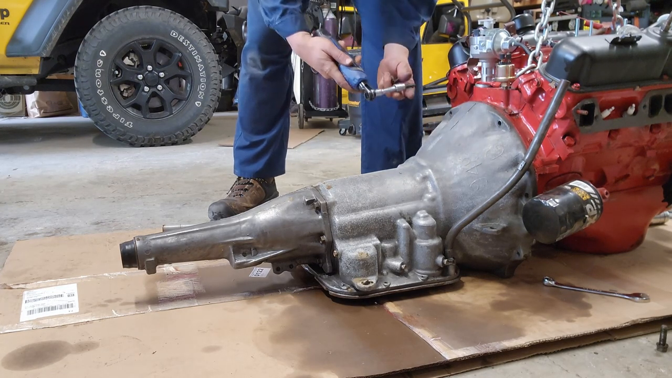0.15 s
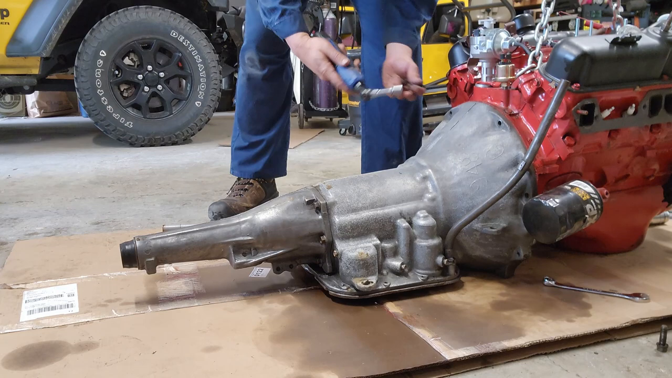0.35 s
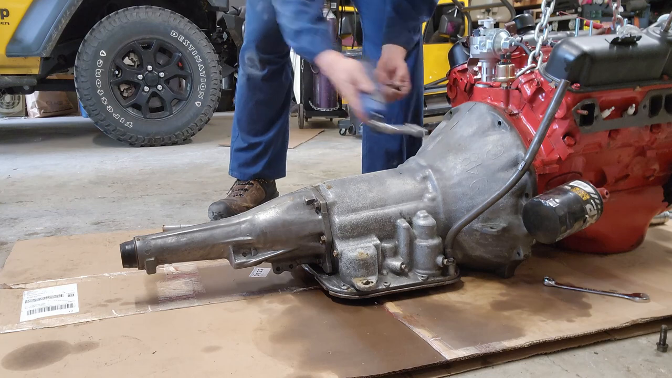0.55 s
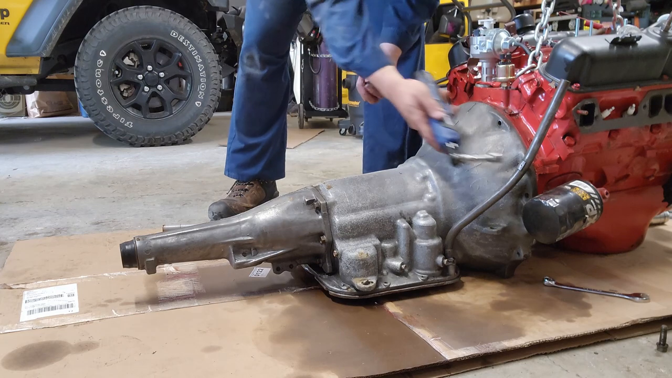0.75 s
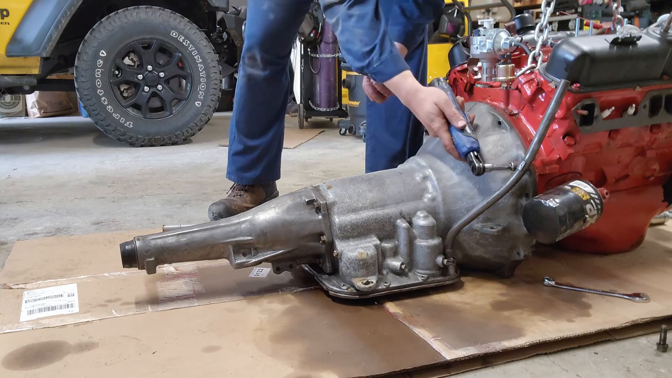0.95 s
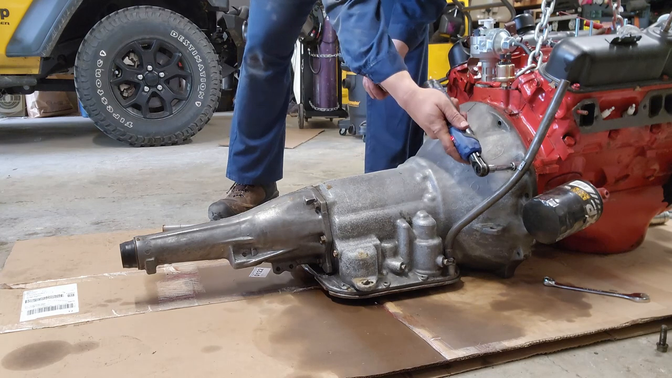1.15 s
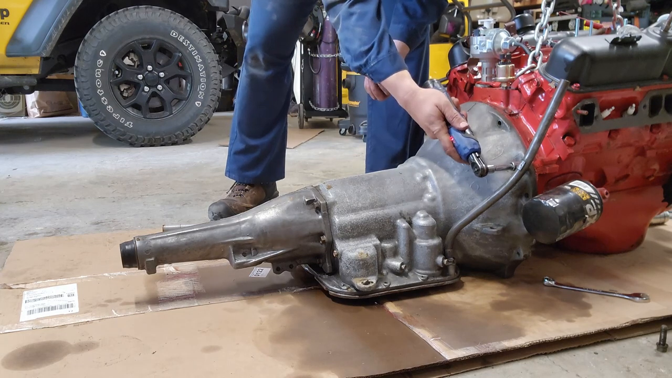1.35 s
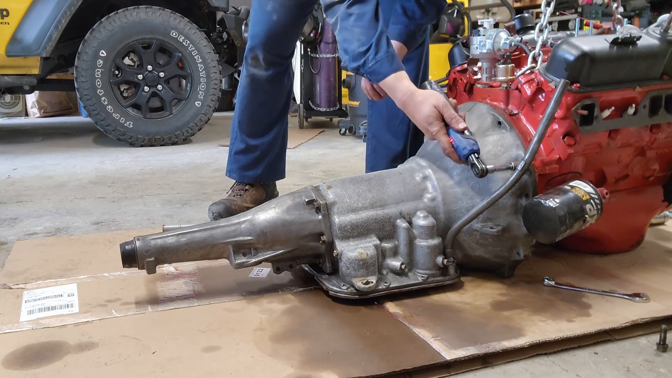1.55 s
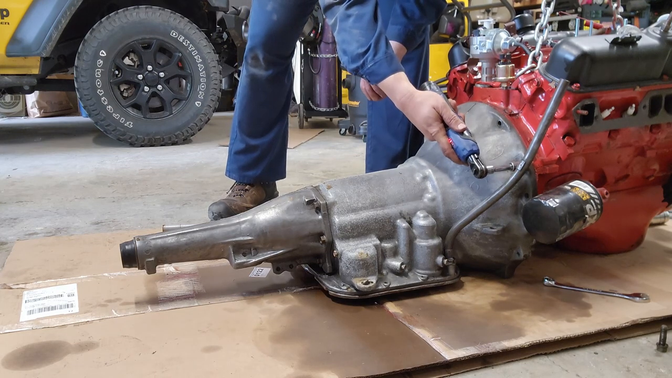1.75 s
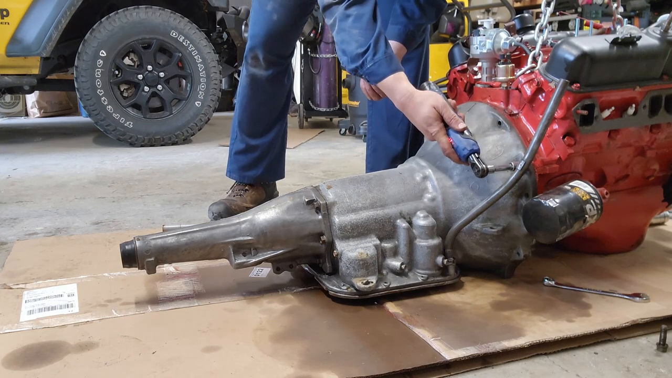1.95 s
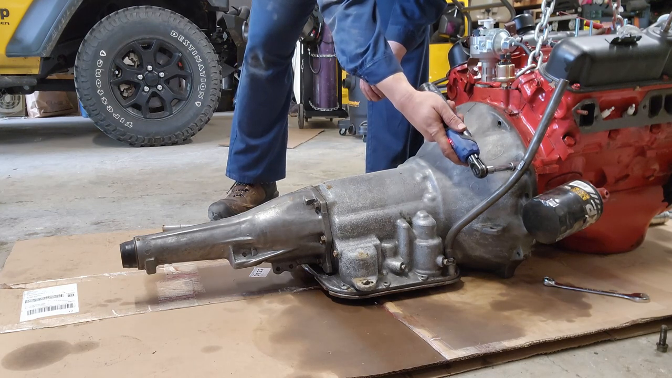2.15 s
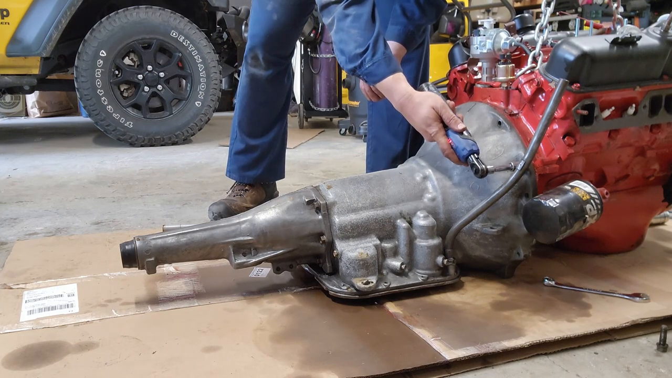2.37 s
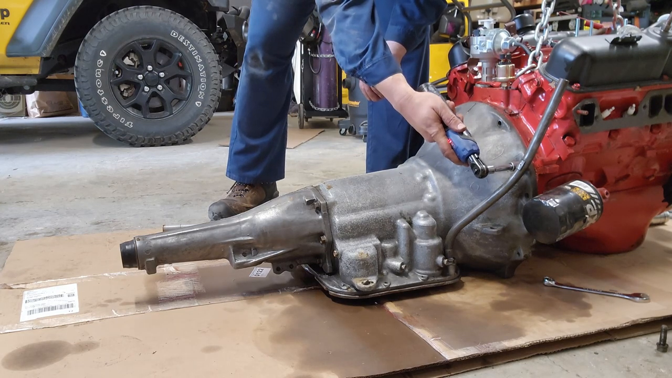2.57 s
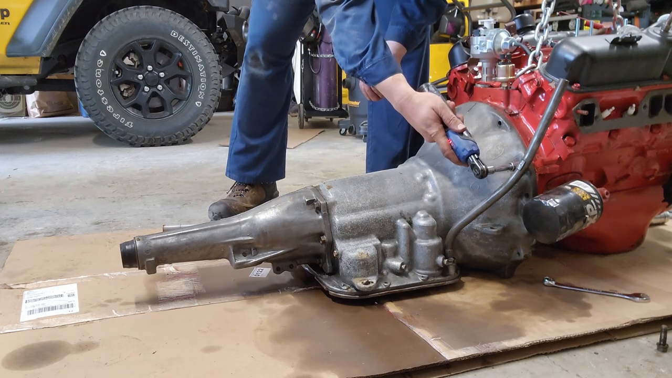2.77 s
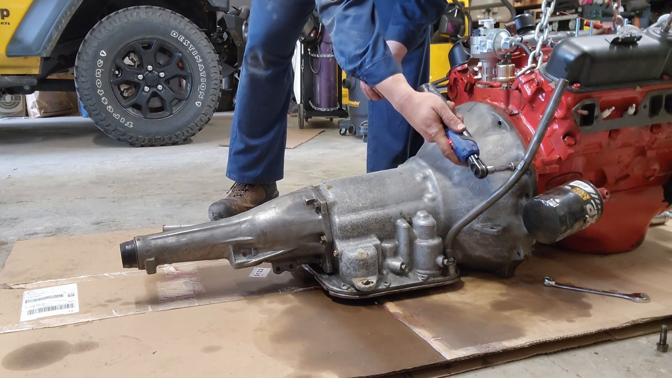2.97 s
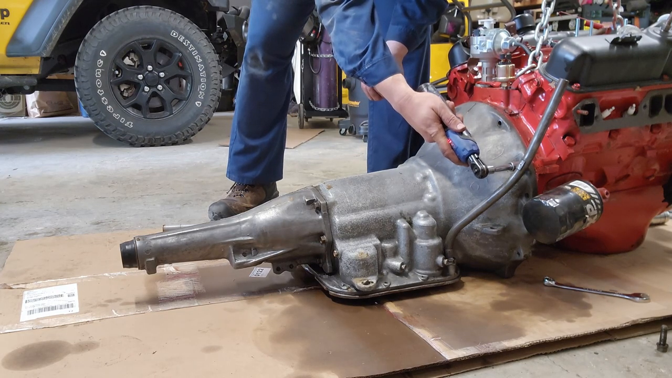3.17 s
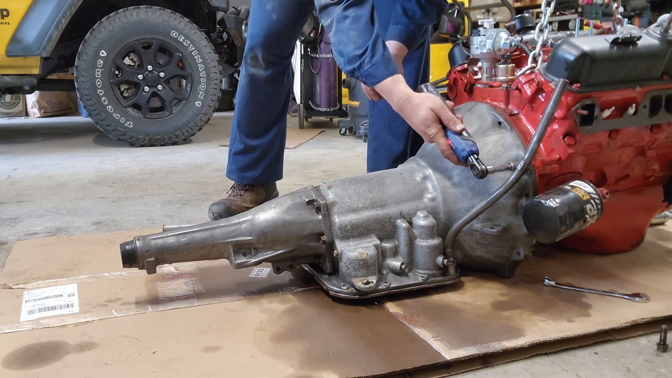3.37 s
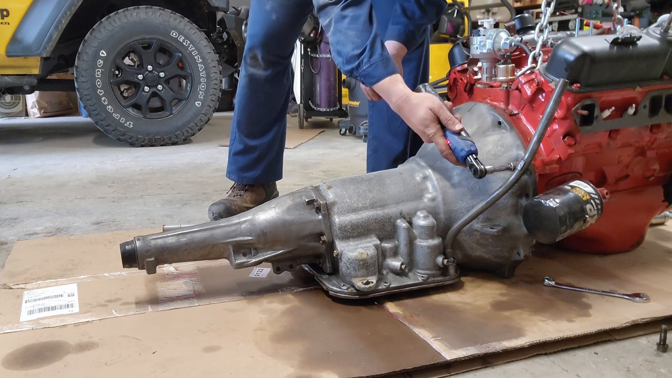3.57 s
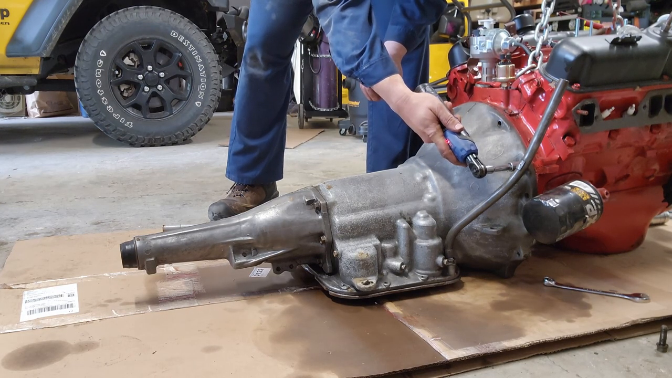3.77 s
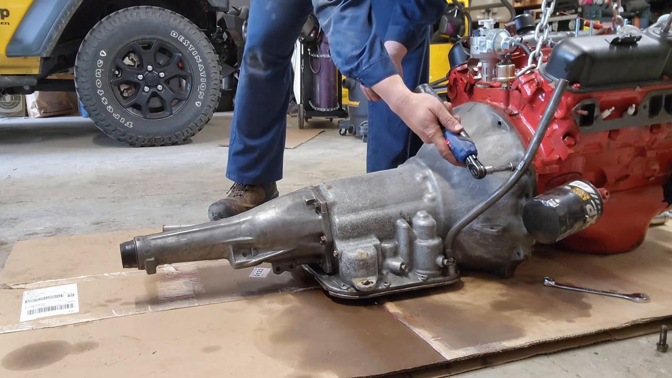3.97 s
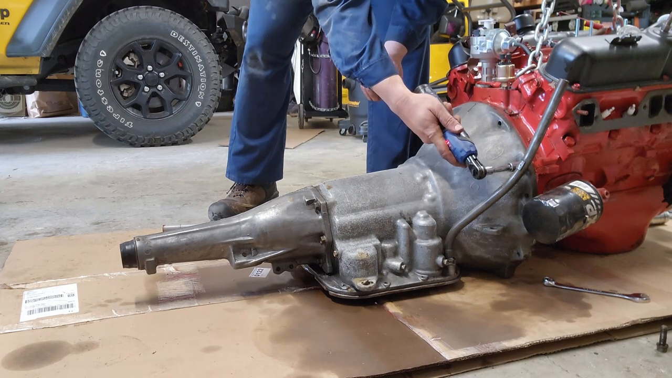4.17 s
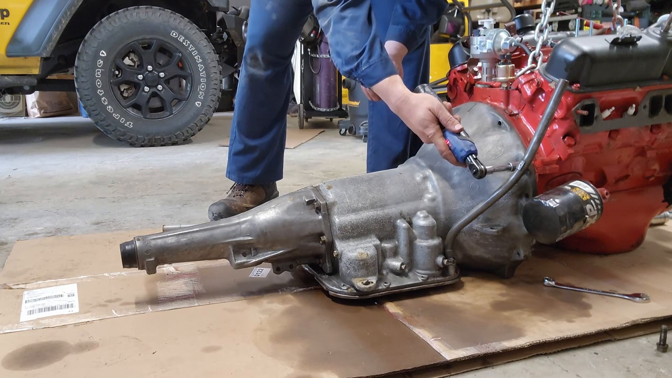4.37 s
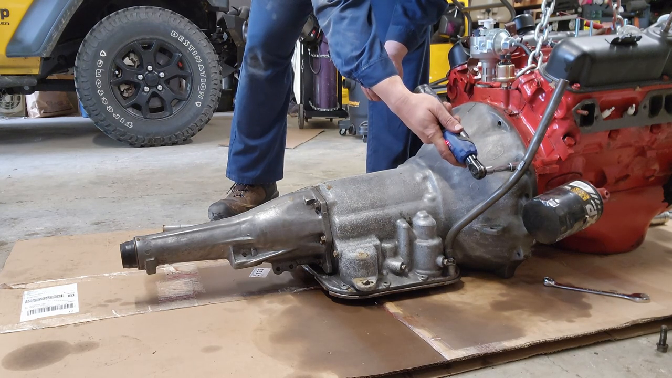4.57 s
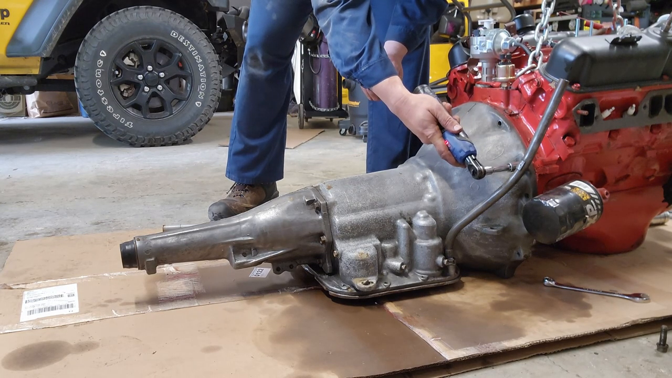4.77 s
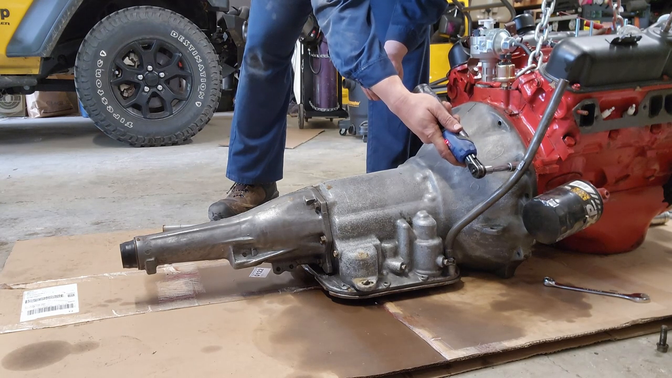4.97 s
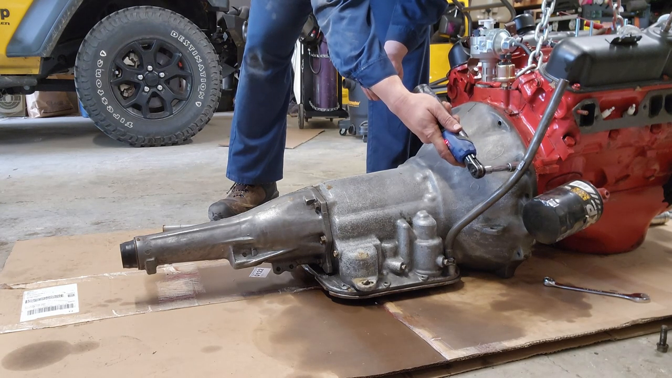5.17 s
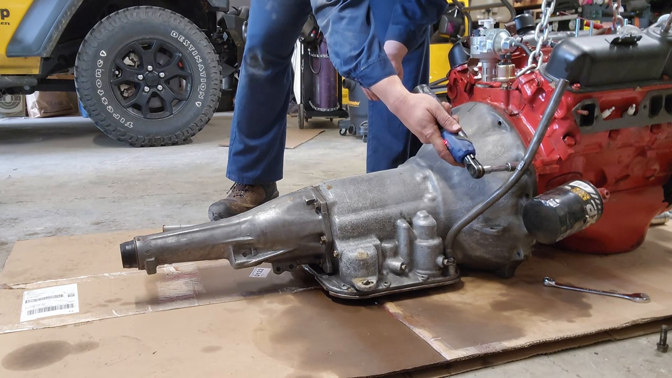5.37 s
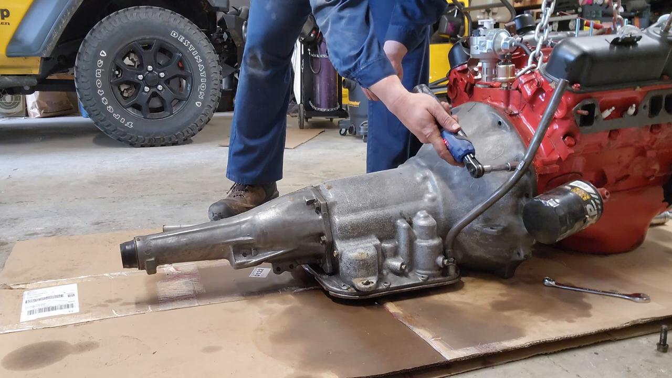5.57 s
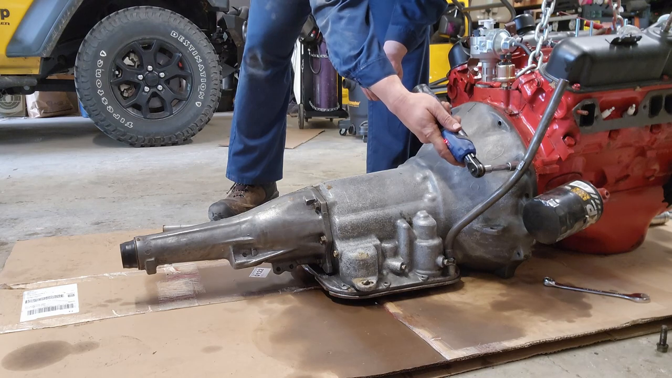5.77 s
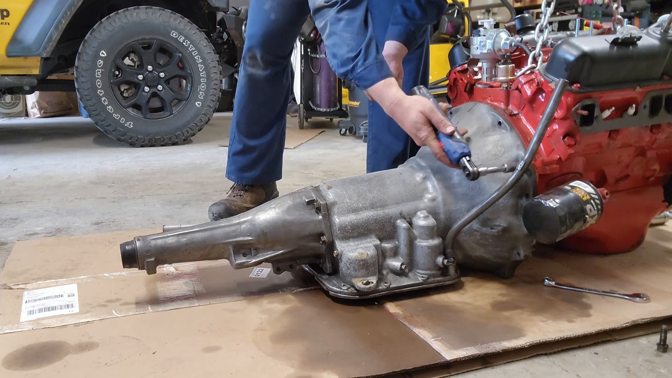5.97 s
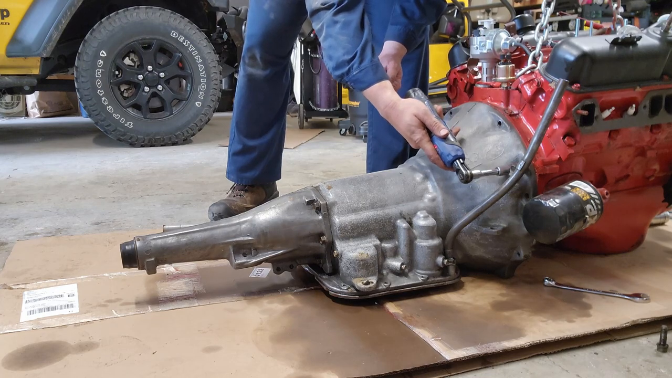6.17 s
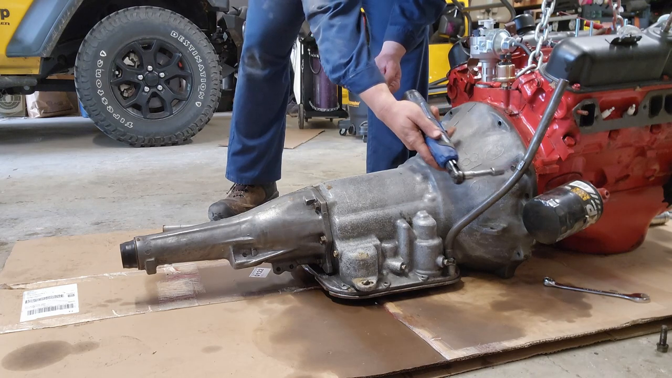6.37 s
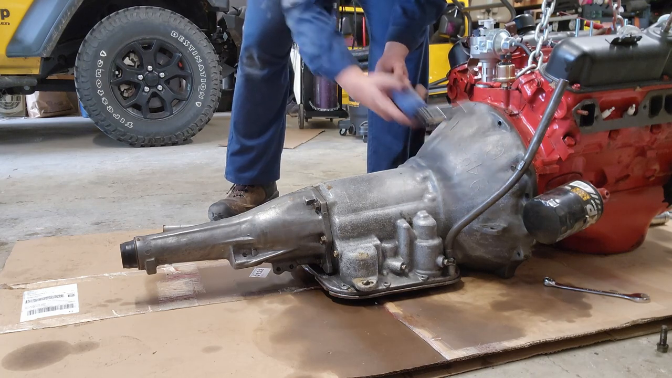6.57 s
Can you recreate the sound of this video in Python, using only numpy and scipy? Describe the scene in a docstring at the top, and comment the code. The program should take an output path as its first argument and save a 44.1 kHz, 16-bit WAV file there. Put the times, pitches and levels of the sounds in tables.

```python
"""Cordless ratchet in a garage

A power ratchet spins a bolt out of a transmission's bell housing. The socket knocks onto the bolt
and the motor hums: a crank rocks the head, its gears rattle and the pawl snaps once a stroke.
With the trigger let go it coasts down in ever slower clicks. Behind it: room air, faint chirps."""
import sys
import numpy as np
from scipy import signal
from scipy.fft import rfft, irfft
from scipy.io import wavfile
from scipy.ndimage import uniform_filter1d

SR = 44100
rng = np.random.default_rng(int(sys.argv[2]) if len(sys.argv) > 2 else 0)


def log_audio(samples):
    """Write samples as a 16-bit WAV file to the path given in sys.argv[1]."""
    # one column per channel
    frames = np.atleast_2d(samples).T
    # limit to full scale, then quantise
    limited = np.clip(frames, -1, 1)
    pcm = np.round(limited * 32767).astype(np.int16)
    wavfile.write(sys.argv[1], SR, pcm)


N = 291942
TIME = np.arange(N) / SR
START_S, ENGAGE_S, RELEASE_S = 1.17, 1.221, 5.819  # trigger pulled, gears engage, trigger let go
FULL_STROKE_HZ = 64.87

# gear rattle spectrum (frequency [Hz], density [dB])
GEAR_SPECTRUM = [(100, -46), (300, -21.5), (480, -8), (750, -3.5), (1050, -3.5), (1400, -0.5), (2100, 0),
                 (2750, -2), (4300, 0), (5400, -3.5), (6800, 0.2), (9000, -1), (15500, 0)]
# loaded pawl spectrum (frequency [Hz], density [dB])
PAWL_SPECTRUM = [(150, -54), (1000, -23), (3000, -13.5), (4300, -10.5), (6000, -21.5), (9500, -8.5),
                 (10700, -4.5), (11600, 0), (12200, 2.5), (13000, -15), (14000, -5.5), (16000, -16.5)]
# socket chink spectrum (frequency [Hz], density [dB])
SOCKET_SPECTRUM = [(500, -45), (4300, -21.5), (5300, -2.5), (5800, -11), (6450, -4), (7400, -8),
                   (9000, -4.5), (16000, -28)]


def amp(db):
    """Decibels to gain."""
    return 10 ** (np.asarray(db) / 20)


def unit_rms(x):
    """Scale to rms 1."""
    return x / np.sqrt(np.mean(x ** 2) + 1e-20)


def log_interp(points, hz):
    """Interpolate a table over log frequency."""
    point_hz, value = np.transpose(points)
    return np.interp(np.log(hz + 1), np.log(point_hz + 1), value)


def waver(width_hz):
    """Low-passed noise of rms 1."""
    lowpass = np.exp(-(np.fft.rfftfreq(N, 1 / SR) / width_hz) ** 2)
    return unit_rms(irfft(rfft(rng.standard_normal(N)) * lowpass, N))


def impulses(at_s, gain):
    """Single-sample blows."""
    return np.bincount(np.clip(np.round(at_s * SR).astype(int), 0, N - 1), gain, N)


def colour(x, spectrum, size=4096):
    """Minimum-phase filter of unit energy."""
    log_gain = np.log(amp(log_interp(spectrum, abs(np.fft.fftfreq(size, 1 / SR)))))
    taps = np.fft.ifft(np.exp(np.conj(signal.hilbert(log_gain)))).real[:size // 2]
    return signal.oaconvolve(x, taps / np.linalg.norm(taps))[:N]


def chatter(blows, decay_s, linger_db, linger_s):
    """Each blow sets loose steel buzzing: a short burst and a weaker, longer one."""
    t = TIME[:SR // 8]
    power = np.exp(-2 * t / decay_s) + amp(linger_db) ** 2 * np.exp(-2 * t / linger_s)
    return np.sqrt(abs(signal.oaconvolve(blows ** 2, power)[:N])) * rng.standard_normal(N)


def ring(blows, modes):
    """Blows excite damped modes."""
    t = TIME[:SR // 2]
    response = sum(amp(db - 60 * t / t60_s) * np.sin(2 * np.pi * hz * t) for hz, db, t60_s in modes)
    return signal.oaconvolve(blows, response)[:N]


def direct(x, lag_samples=7):
    """The straight path arrives on the left first."""
    return np.array([x, np.roll(x, lag_samples)])


def echoes(wet_db, near_db, count=2000):
    """Stereo response: early echoes off casing and floor, then the room's tail."""
    # garage reverberation (frequency [Hz], t60 [s])
    room_t60 = [(150, 1), (800, 1.2), (2000, 0.5), (5000, 0.48), (10000, 0.44), (16000, 0.72)]
    t = TIME[:SR]
    taps = np.zeros((2, SR))
    arrivals = (np.arange(count) + rng.random((2, count))) * (SR - 1) / count
    np.put_along_axis(taps, arrivals.astype(int), rng.choice([-1., 1.], arrivals.shape), 1)
    near = taps * (t > .001) * np.exp(-t / 0.0048)
    hz, frame_s, frames = signal.stft(taps * (t > .008), SR, nperseg=256)
    decay = amp(-60 * frame_s / log_interp(room_t60, hz)[:, None])
    tail = signal.istft(frames * decay, SR, nperseg=256)[1][:, :SR]
    paths = sum(amp(db) * path / np.linalg.norm(path, axis=1, keepdims=True)
                for path, db in [(near, near_db), (tail, wet_db)])
    # long waves reach both sides alike
    side_bass = signal.sosfilt(signal.butter(1, 450, fs=SR, output="sos"), paths[0] - paths[1])
    return paths + np.array([[-.5], [.5]]) * side_bass


def garage(x, wet_db, near_db):
    """A still source: direct sound and one set of echoes."""
    room = signal.fftconvolve(x[None], echoes(wet_db, near_db), axes=1)[:, :N]
    return (direct(x) + room) / np.linalg.norm(amp([0, wet_db, near_db]))


def swaying(x, wet_db, near_db, hop_samples):
    """The tool sways in the hand, so its echoes drift into new paths."""
    out = direct(x)
    size = 2 * hop_samples
    window = np.sin(np.pi * np.arange(size) / size)
    for start in range(round(START_S * SR) - hop_samples, N - hop_samples, hop_samples):
        piece = x[start:start + size] * window[:N - start]
        room = signal.fftconvolve(piece[None], echoes(wet_db, near_db), axes=1)[:, :N - start]
        out[:, start:start + room.shape[1]] += room
    return out / np.linalg.norm(amp([0, wet_db, near_db]))


def air(hiss_db=-69.5, rumble_db=-76.5):
    """Steady garage noise with a faint low rumble, its level varied at random."""
    # room noise spectrum (frequency [Hz], density [dB])
    air_spectrum = [(60, -16), (120, -9), (200, -15), (450, -8.5), (600, -0.5), (680, -7.5), (900, -20),
                    (1400, -14), (2050, -10), (2860, -25), (3620, -20), (4860, -14.5), (7400, -23),
                    (10700, -37), (16000, -43)]
    shared, left, right = (colour(rng.standard_normal(N), air_spectrum) for _ in range(3))
    hiss = 0.56 * shared + 1.17 * np.array([left, right])
    band = signal.butter(3, [38, 80], "bandpass", fs=SR, output="sos")
    rumble = signal.sosfilt(band, rng.standard_normal((3, N))) * amp(5.5 * waver(5.1))
    return amp(hiss_db) * hiss + amp(rumble_db) * unit_rms(rumble[0] + rumble[1:])


def chirps(length_s=0.031):
    """Short, thin whistles from far off, mostly echo."""
    # whistles (start [s], pitch [Hz], level [dB])
    notes = [(.335, 4780, -67), (.38, 4980, -58), (.425, 3600, -68), (.785, 3620, -64), (.88, 4950, -56)]
    whistles = np.zeros(N)
    for start_s, hz, db in notes:
        envelope = np.sin(np.pi * np.clip((TIME - start_s) / length_s, 0, 1))
        whistles += amp(db) * envelope * np.sin(2 * np.pi * hz * TIME + waver(120))
    return garage(whistles, wet_db=0.0, near_db=-1.0)


def dying_click(snap_db=-44, rattle_db=-48, t60_s=0.37):
    """At the start, the echo of a pawl click and its rattle dies away."""
    tail = [amp(snap_db) * colour(snap, PAWL_SPECTRUM) + amp(rattle_db) * colour(rattle, GEAR_SPECTRUM)
            for snap, rattle in rng.standard_normal((2, 2, N))]
    return np.array(tail) * amp(-60 * TIME / t60_s)


def knocks():
    """The socket is handled and set on the bolt; the drive takes up its slack with a thud."""
    # socket and tool knocks (time [s], thud [dB], clank [dB], tick [dB], chink [dB])
    hits = [(0.035, -44, -41, -33, -55), (0.1965, -80, -75, -38, -41), (0.265, -88, -80, -57, -51),
            (0.378, -80, -64, -66, -50), (0.401, -53, -62, -75, -75), (0.9713, -37, -14, -38, -25),
            (1.158, -73, -55, -47, -26), (1.215, -36.5, -46, -42, -50), (1.2278, -36, -34, -13, -33),
            (1.243, -21.5, -23, -28, -35)]
    # struck steel, housing thud and light tick spectra (frequency [Hz], density [dB])
    steel_spectrum = [(150, -34), (400, -17), (800, -15), (1200, -10), (1600, -2), (2600, -4.5), (3500, 9),
                      (4500, -2), (5700, -3), (8700, -9.5), (10000, -14), (14000, -16)]
    thud_spectrum = [(80, -22), (230, -11), (500, -7.5), (900, 7), (1450, 1.5), (2200, 0), (6000, -7),
                     (16000, -60)]
    tick_spectrum = [(150, -62), (1000, -23), (4000, -4), (6000, -14), (9000, 3), (12000, 7.5), (16000, -7)]
    # casing and extension bar modes (frequency [Hz], level [dB], t60 [s])
    casing_modes = [(1577, -3, 0.1), (2410, -13, 0.22), (3494, -7, .19), (3860, -6, 0.14)]
    at_s, thud_db, clank_db, tick_db, chink_db = np.transpose(hits)
    blows = impulses(at_s, amp(clank_db))
    clank = chatter(blows, decay_s=0.0077, linger_db=-30, linger_s=0.022)
    thud = chatter(impulses(at_s, amp(thud_db)), decay_s=0.035, linger_db=-2.5, linger_s=0.045)
    tick = chatter(impulses(at_s, amp(tick_db)), decay_s=0.0015, linger_db=-32, linger_s=0.02)
    chink = chatter(impulses(at_s, amp(chink_db)), decay_s=0.0047, linger_db=-11, linger_s=0.023)
    steel = amp(-8.0) * colour(clank, steel_spectrum) + amp(-24.0) * ring(blows, casing_modes)
    heavy = steel + amp(-9.5) * colour(thud, thud_spectrum)
    bright = colour(tick, tick_spectrum) + amp(-13.5) * colour(chink, SOCKET_SPECTRUM)
    return garage(heavy, wet_db=2.5, near_db=3.5) + garage(bright, wet_db=-5.0, near_db=1.0)


def motor_speed(spin_up_s=0.075, drag_per_s=1.06, friction_hz_per_s=41.0):
    """Share of full speed: run-up, steady running, then slowing by drag and dry friction."""
    run_up = 1 - np.exp(-np.maximum(TIME - START_S, 0) / spin_up_s)
    friction = friction_hz_per_s / drag_per_s / FULL_STROKE_HZ
    coast = (1 + friction) * np.exp(-drag_per_s * np.maximum(TIME - RELEASE_S, 0)) - friction
    return run_up * np.maximum(coast, 0)


def crank_turns(speed, last_click_s=6.514):
    """Running stroke count, offset to be whole at the last click."""
    turns = np.cumsum(speed) * FULL_STROKE_HZ / SR
    return turns + (-np.interp(last_click_s, TIME, turns)) % 1


def stroke_times(turns, strokes):
    """Times [s] at which the crank reaches the given stroke counts."""
    running = np.gradient(turns) > 0
    return np.interp(strokes, turns[running], TIME[running])


def effort(speed, rise_s=0.047):
    """Drive load: full once the gears engage, fading with speed while coasting."""
    engaged = np.clip((TIME - ENGAGE_S) / rise_s, 0, 1)
    return engaged * np.where(TIME < RELEASE_S, 1, speed ** 1.22)


def motor_groan(start_s=1.165, peak_s=1.295, end_s=1.32, hz=228):
    """The motor groans briefly as it pulls away from rest."""
    swell = amp(np.interp(TIME, [start_s, peak_s], [-66.5, -48]))
    envelope = uniform_filter1d(swell * (TIME > start_s) * (TIME < end_s), size=256)
    return envelope * np.sin(2 * np.pi * hz * TIME + 0.54 * waver(30))


def motor_hum(turns, speed, weak_db=-39.0, strong_db=1.0, fade_s=0.11):
    """Motor and crank sing at stroke-rate multiples; uneven strokes and grip make each tone waver."""
    # low drive tones and gear whine (order [x stroke rate], level [dB])
    low_orders = [(2, -24), (3, -17.5), (4, -20.5), (5, -12.5), (6, -14.5), (7, -15), (12, -8.5),
                  (13, -1.5), (14, -4.5), (15, -3.5), (16, -5), (17, -4.5), (18, -11)]
    whine_orders = [(21, -3), (28, -5.5), (29, -3.5), (32, 3), (36, 4.5)]
    # envelopes of the strongest orders, 8, 10 and 11 (time [s], level [dB])
    order_8 = [(1.35, -62), (1.51, -61.0), (1.59, -45), (2.03, -51.5), (2.09, -63), (2.39, -49.4),
               (2.47, -60), (3.09, -61.0), (3.23, -49), (3.71, -71), (3.81, -51.5), (4.33, -58),
               (4.47, -47), (4.73, -62), (5.37, -50.0), (5.49, -61), (5.589, -46.5), (5.89, -62)]
    order_10 = [(1.35, -59.5), (2.33, -56), (2.49, -47.5), (2.59, -55), (3.55, -59.5), (3.59, -51.5),
                (4.73, -52), (4.85, -42.5), (5.03, -55.5), (5.89, -50)]
    order_11 = [(1.35, -50), (1.47, -51.5), (2.67, -53), (3.03, -42), (3.15, -57), (3.33, -48),
                (3.41, -59.0), (3.47, -48.0), (4.25, -51), (4.37, -42), (4.59, -58), (4.69, -43.9),
                (4.77, -49), (4.99, -41.5), (5.07, -58), (5.47, -44), (5.89, -50)]
    shaft_turns = turns + 0.006 * waver(10.4)

    def tone(order, db):
        gain = amp(db) * (1 + 0.3 * waver(20))
        phase = 2 * np.pi * (order * shaft_turns + rng.random())
        return gain * np.cos(phase + 0.36 * waver(21.5))

    weak = sum(tone(order, db + 3.5 * waver(10.5)) for order, db in [*low_orders, *whine_orders])
    tones = amp(weak_db) * unit_rms(weak)
    for order, envelope in [(8, order_8), (10, order_10), (11, order_11)]:
        level_db = np.interp(TIME, *np.transpose(envelope)) + strong_db + 2.2 * waver(7.5)
        tones += np.sqrt(2) * tone(order, level_db)
    current = np.exp(-np.maximum(TIME - RELEASE_S, 0) / fade_s)
    return effort(speed) * current * speed ** 1.4 * tones


def gear_rattle(turns, speed, level_db=-31.5, slop_strokes=0.02, uneven_db=2.0, dull_hz=4700):
    """The rocking yoke knocks several times a stroke over the grinding of the gear teeth."""
    # yoke knocks (position [share of stroke], level [dB])
    yoke_knocks = [(0.122, -6.5), (0.271, 0), (.34, 0.5), (0.471, -3), (.62, -1), (0.782, -3), (.96, -0.5)]
    # shaken housing spectrum (frequency [Hz], density [dB])
    housing_spectrum = [(60, -60), (110, -15), (140, -18.5), (195, 4), (260, -10.5), (400, -0.5), (600, -1),
                        (1200, -1.5), (5000, -46.5)]
    position, db = np.transpose(yoke_knocks)
    strokes = np.arange(int(turns[-1]))[:, None] + position
    late, hard = rng.standard_normal((2,) + strokes.shape)
    at_s = stroke_times(turns, strokes + slop_strokes * late)
    blows = impulses(at_s.ravel(), amp(db + uneven_db * hard).ravel())
    knocking = speed * unit_rms(chatter(blows, decay_s=0.0009, linger_db=-13.0, linger_s=0.0012))
    # slow teeth grind mid-stroke and slide instead of striking, which dulls them
    slowness = 1 - speed
    swell = 1 - 1.25 * slowness * np.cos(2 * np.pi * turns)
    striking, sliding = rng.standard_normal((2, N)) * amp(2.5 * waver(920)) * swell
    sliding = signal.sosfilt(signal.butter(4, dull_hz, fs=SR, output="sos"), sliding)
    teeth = np.sqrt(speed.clip(0, 1)) * striking + np.sqrt(slowness.clip(0, 1)) * sliding
    drive = amp(level_db) * effort(speed) * (knocking + (0.74 + 0.52 * slowness) * teeth)
    housing = colour(drive * speed ** 2.5, housing_spectrum)  # heavy: only a fast crank shakes it
    return amp(5.0) * colour(drive, GEAR_SPECTRUM) + amp(-21.5) * housing


def loose_socket(turns, chink_db=-16.5, uneven_db=2.0):
    """While the socket sits loose on the bolt, each stroke makes it chink."""
    # loose spells (middle [s], length [s], level [dB])
    spells = [(2.008, 0.23, 0), (2.66, 0.22, -2.5), (3.147, 0.27, -1.5), (4.423, .26, -1.5)]
    at_s = stroke_times(turns, np.arange(1, int(turns[-1]) + 1))
    play = sum(amp(db) * np.sqrt(np.maximum(1 - (2 * (at_s - middle_s) / length_s) ** 2, 0))
               for middle_s, length_s, db in spells)
    blows = impulses(at_s, play * amp(chink_db + uneven_db * rng.standard_normal(len(at_s))))
    return colour(chatter(blows, decay_s=0.0015, linger_db=-24, linger_s=0.006), SOCKET_SPECTRUM)


def coasting_pawl(bounce_s=0.0033, bounce_db=-5.5):
    """The unloaded pawl lands with a short, wide crack and bounces once."""
    # coasting clicks (time [s], level [dB])
    landings = [(6.0447, -16), (6.073, -16), (6.0926, -16.5), (6.1201, -15), (6.148, -15), (6.1793, -13),
                (6.2108, -21), (6.247, -16.5), (6.2857, -15.5), (6.329, -18.5), (6.3773, -19),
                (6.4361, -17.5), (6.5144, -16)]
    # unloaded pawl spectrum (frequency [Hz], density [dB])
    free_spectrum = [(1000, -19), (3800, -5), (6500, -11), (9500, -5), (12000, 4.5), (16000, -3.5)]
    at_s, db = np.transpose(landings)
    bounces = impulses(at_s + bounce_s * rng.uniform(0.7, 1.4, len(at_s)), amp(db + bounce_db))
    crack = chatter(impulses(at_s, amp(db)) + bounces, decay_s=0.0011, linger_db=-16, linger_s=0.004)
    return amp(3.5) * colour(crack, free_spectrum)


def pawl_pressure(mean_db=-28.5, swing=1.15, slack_s=0.033):
    """Load on the pawl as the socket wobbles round; it goes slack while coasting."""
    # bite, swelling about once per bolt turn (time [s], relative level [dB])
    bite = [(1.26, -31), (1.3, -26.5), (1.36, -32.5), (1.62, -25.5), (1.7, -28), (1.761, -21.5),
            (1.82, -33), (1.86, -25), (1.94, -30), (2.14, -27.6), (2.2, -25.5), (2.38, -30.5),
            (2.44, -29.5), (2.74, -26.5), (2.82, -24), (2.86, -31.5), (2.9, -26.5), (3.0, -31), (3.08, -25),
            (3.2, -32.1), (3.28, -25), (3.48, -28.5), (3.54, -22.5), (3.58, -30.5), (3.68, -25),
            (3.78, -29), (4.14, -24), (4.2, -32.5), (4.26, -27.0), (4.4, -27.5), (4.48, -25.5), (4.74, -26),
            (4.78, -28.3), (5.14, -26.5), (5.22, -24.5), (5.36, -30.5), (5.4, -26), (5.44, -29),
            (5.52, -26), (5.56, -29.5), (5.66, -22.4), (5.92, -25.5), (5.96, -23), (6.02, -30)]
    at_s, db = np.transpose(bite)
    loaded = np.interp(TIME, [ENGAGE_S, at_s[0], at_s[-1], at_s[-1] + slack_s], [0, 1, 1, 0])
    return loaded * amp(mean_db + swing * (np.interp(TIME, at_s, db) - db.mean()))


def loaded_pawl(turns, uneven_db=3.0, play_s=0.0002, drop_s=0.00076, bounce_s=0.0036):
    """Under load the pawl drops off a tooth once a stroke, bounces and drags over the next."""
    # hard snaps where the pawl catches (time [s], relative level [dB])
    snaps = [(1.542, 1), (1.5884, -7), (1.621, -0.5), (1.7423, -3), (2.177, -2), (2.206, 0), (2.24, 2),
             (2.3307, 1), (2.377, -1), (2.7608, -2), (2.7947, -1), (2.823, 4), (2.899, 0.5), (3.9345, 2),
             (4.12, -3), (4.7037, -0.5), (5.521, -0.5), (6.0016, -5)]
    # pawl modes (frequency [Hz], level [dB], t60 [s])
    pawl_modes = [(11610, -5, 0.018), (11750, 1, 0.01)]
    pressure = pawl_pressure()
    snap_s, snap_db = np.transpose(snaps)
    at_s = stroke_times(turns, np.arange(1, int(turns[-1]) + 1))
    force, rebound, late, play = rng.standard_normal((len(at_s), 4)).T
    at_s += play_s * play
    light = abs(at_s[:, None] - snap_s).min(1) > 0.007  # a hard snap replaces a nearby drop
    drops = pressure * impulses(at_s, light * amp(12.0 + uneven_db * np.minimum(force, 1)))
    drops += impulses(snap_s + drop_s, amp(snap_db - 9.5))
    bounces = pressure * impulses(at_s + bounce_s + 0.0011 * late, amp(7.5 + uneven_db * rebound))
    dragging = amp(-3.5) * pressure * rng.standard_normal(N)
    buzz = chatter(drops + bounces, decay_s=0.0014, linger_db=-14.5, linger_s=0.0051)
    return colour(buzz + dragging, PAWL_SPECTRUM) + amp(-6.0) * ring(drops, pawl_modes)


def scene():
    """Ratchet, knocks and background in the garage; the pawl is a little louder on the left."""
    speed = motor_speed()
    turns = crank_turns(speed)
    rattle = swaying(gear_rattle(turns, speed), wet_db=3.0, near_db=3.0, hop_samples=3400)
    motor = swaying(motor_hum(turns, speed), wet_db=-9.5, near_db=-12.5, hop_samples=9000)
    motor += motor_groan()
    snaps = swaying(loaded_pawl(turns) + loose_socket(turns), wet_db=-1.5, near_db=-3.5, hop_samples=7000)
    snaps += garage(coasting_pawl(), wet_db=-3.5, near_db=0.5)
    snaps *= amp([[0.6], [-0.5]])
    return rattle + motor + snaps + knocks() + dying_click() + chirps() + air()


def record(dry, cutoff_hz=15840):
    """Steep low-pass band limit."""
    lowpass = signal.firwin(511, cutoff_hz, window=("kaiser", 9), fs=SR)
    return signal.oaconvolve(dry, lowpass[None], "same")


dry = scene()
out = record(dry)
log_audio(out)
```